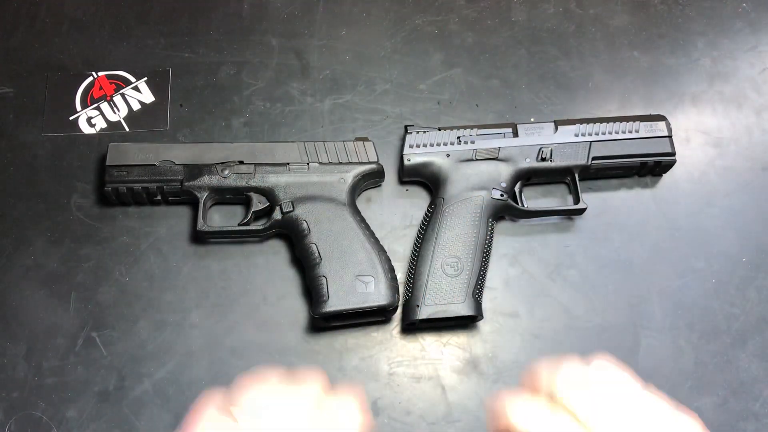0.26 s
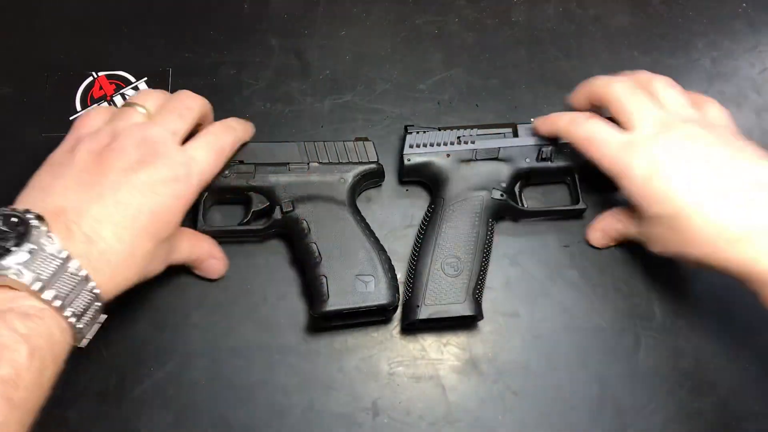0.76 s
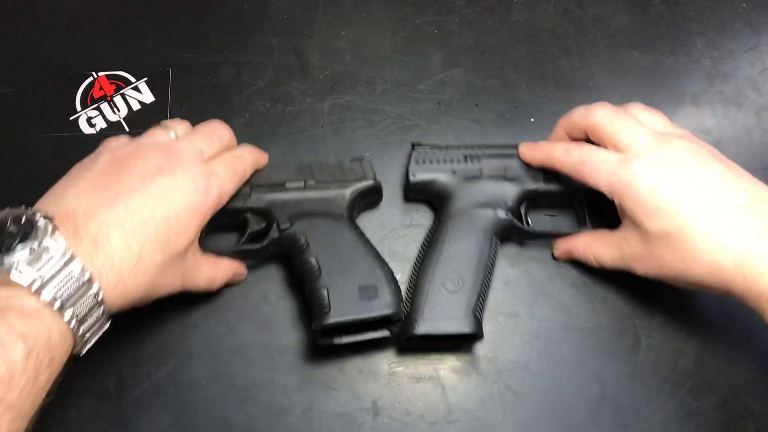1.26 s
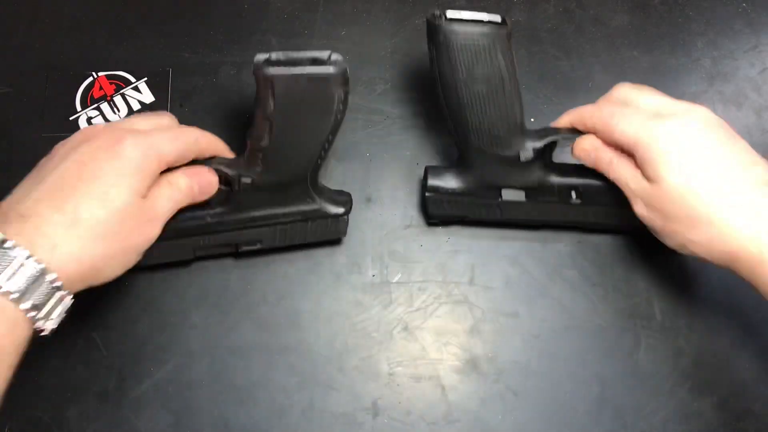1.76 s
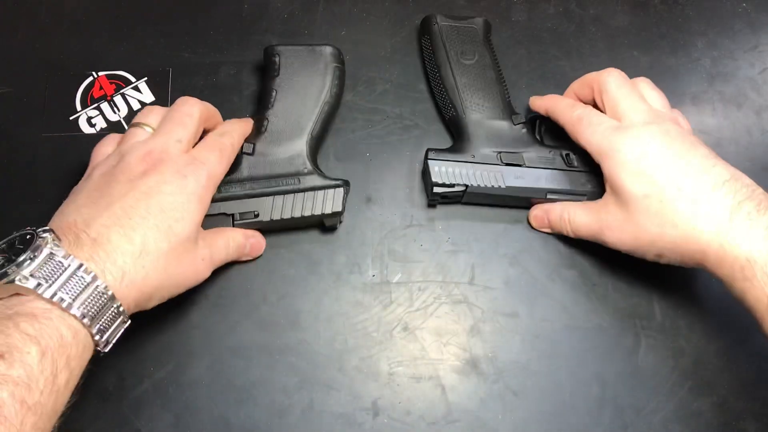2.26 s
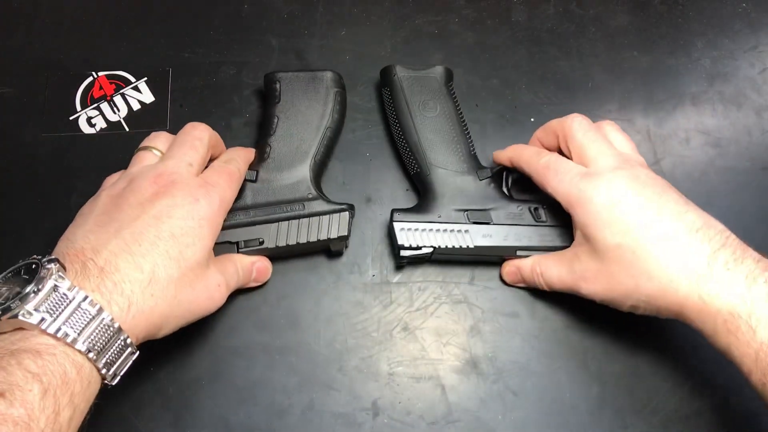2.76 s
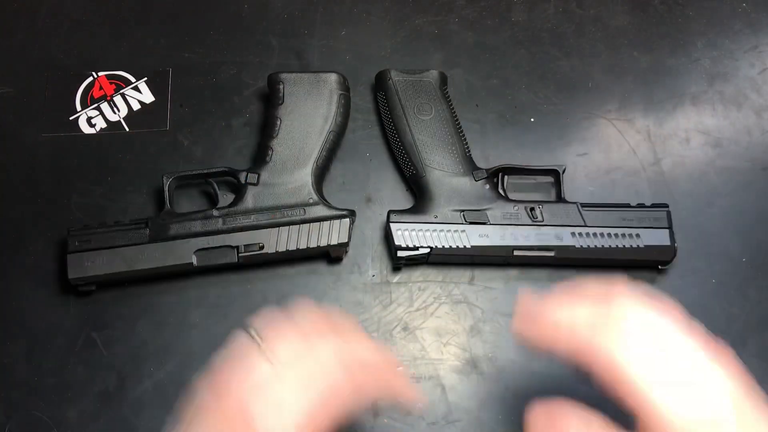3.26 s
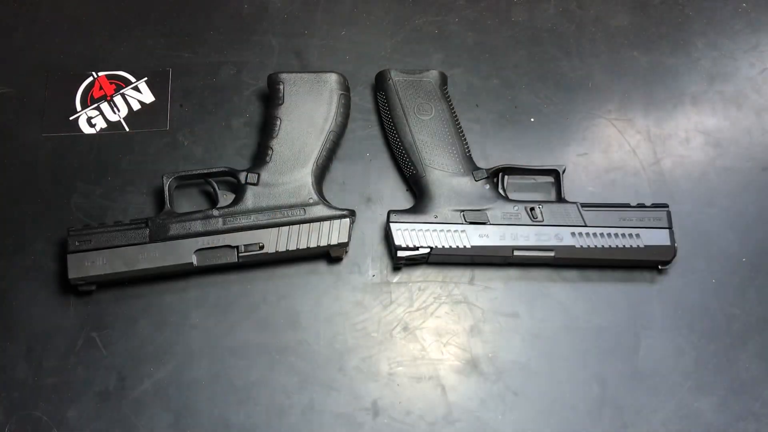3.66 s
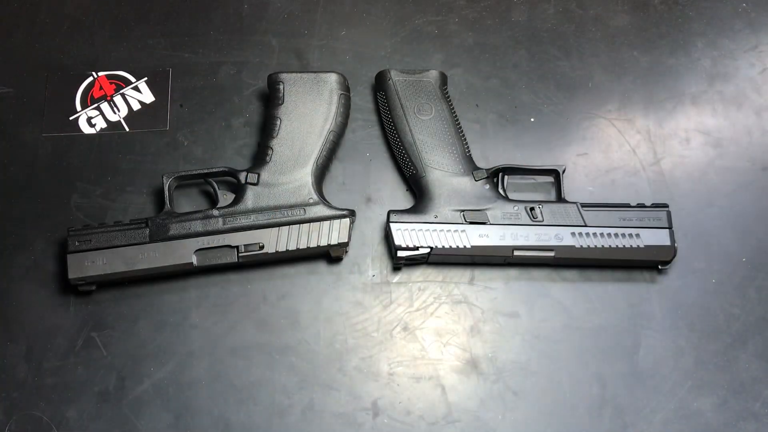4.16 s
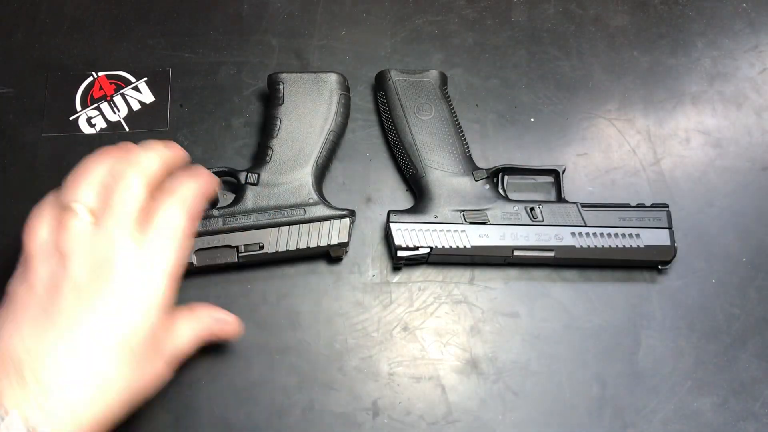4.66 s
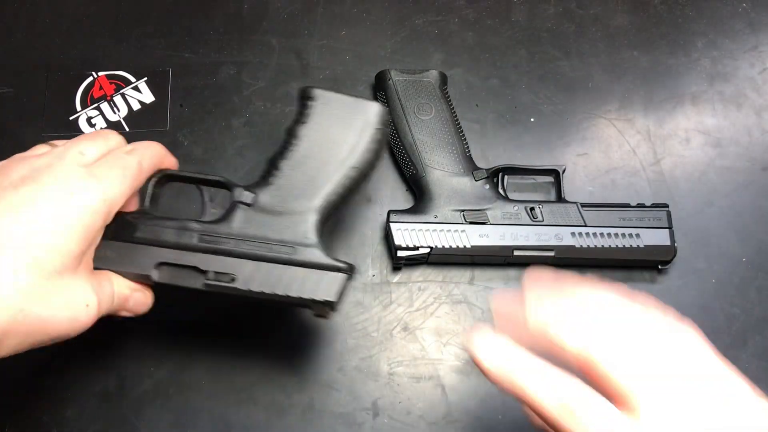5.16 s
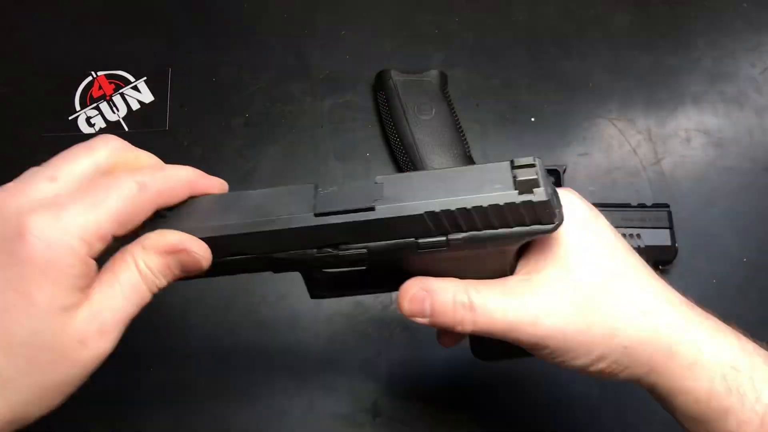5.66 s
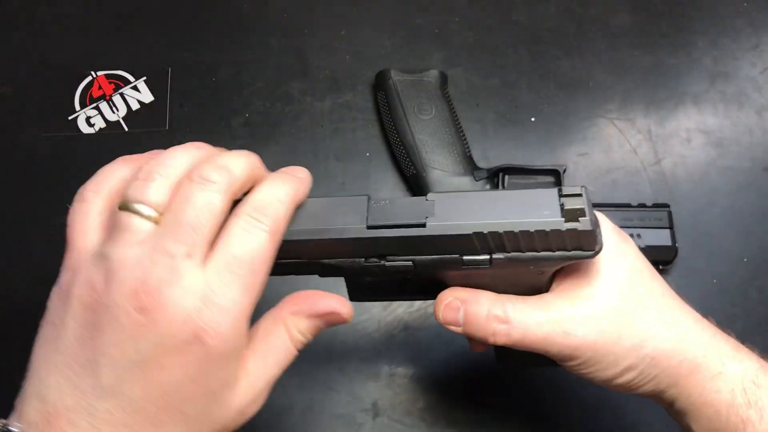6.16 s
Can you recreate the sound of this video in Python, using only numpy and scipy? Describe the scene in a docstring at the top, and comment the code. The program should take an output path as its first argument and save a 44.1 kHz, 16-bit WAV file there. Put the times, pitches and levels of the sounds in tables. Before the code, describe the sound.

In a small, slightly live room with a faint mains hum, hands rub softly over two pistols on a table. A tick and thump lead into one loud, bright steel double clack, followed by a run of low table thumps. Later come softer thuds, light clicks and dry sliding strokes. The microphone is close.

```python
"""A small room with a mains hum: two pistols are turned over by hand on a table, close to the microphone.
Damped steel modes and noise bursts snap in one loud double clack, with a faint spring ring behind it.
Frames tick in short noise bursts, thump the table's low modes and drag across it in strokes of noise.
Palms rub and hiss over the grips as shaped noise; duller knocks from farther off arrive as washes of echo."""
import sys
import numpy as np
from scipy import signal
from scipy.fft import rfft, irfft, next_fast_len
from scipy.io import wavfile
from scipy.ndimage import uniform_filter1d, map_coordinates

SR = 44100
rng = np.random.default_rng(int(sys.argv[2]) if len(sys.argv) > 2 else 0)


def file_out(sig):
    """Save sig as 16-bit WAV at sys.argv[1]."""
    # one column per channel
    cols = np.atleast_2d(sig).T
    # limit, then scale
    lim = np.clip(cols, -1, 1)
    pcm = np.round(lim * 32767).astype(np.int16)
    wavfile.write(sys.argv[1], SR, pcm)


N = 282681
T = np.arange(SR // 2) / SR  # time within one event, s


def amp(db):
    """Decibels to gain."""
    return 10 ** (np.asarray(db) / 20)


def unit(x):
    """Scale to rms 1."""
    return x / np.sqrt(np.mean(x ** 2) + 1e-20)


def along(points, hz):
    """Read a curve of (f/Hz, value) points on a log frequency axis."""
    f, v = np.transpose(points)
    return np.interp(np.log(hz + 1), np.log(f + 1), v)


def filtered(x, gain):
    """Shape a sound with a gain that depends on frequency."""
    m = next_fast_len(len(x) + 8192)
    spectrum = rfft(x, m) * gain(np.fft.rfftfreq(m, 1 / SR))
    return irfft(spectrum, m)[:len(x)]


def noise(gain, size):
    """Coloured noise of rms 1."""
    return unit(filtered(rng.standard_normal(size), gain))


def hump(hz, centre, octaves):
    """One broad resonance on a log axis, with the bass far below it rolled off."""
    peak = 1 / (1 + (np.log2((hz + 1) / centre) / octaves) ** 2)
    return peak / np.sqrt(1 + (centre / 8 / (hz + 1)) ** 4)


def wobble(rate, size):
    """A smooth random curve with rate knots a second."""
    knots = rng.standard_normal(int(size * rate / SR) + 4)
    return map_coordinates(knots, [np.arange(size) * rate / SR])


def patchy(x, depth_db):
    """Shifting contact: the colour of a rub changes from moment to moment."""
    z = signal.stft(x, nperseg=1024)[2]
    field = rng.standard_normal(z.shape)
    for _ in range(2):
        field = uniform_filter1d(field, size=7, axis=0)  # smooth over frequency
        field = uniform_filter1d(field, size=5, axis=1)  # smooth over time
    return unit(signal.istft(z * amp(depth_db * unit(field)), nperseg=1024)[1][:len(x)])


def add(track, s, sound):
    """Mix a sound in at time s."""
    start = max(round(s * SR), 0)
    part = track[start:start + len(sound)]
    part += sound[:len(part)]


# reverberation time of the room: (f/Hz, t60/s)
ROOM_DECAY = [(150, 0.13), (1000, 0.23), (4000, 0.3), (8000, .26), (15000, 0.22)]
# colour of the echo off the walls: (f/Hz, level/dB)
WALL_COLOUR = [(100, 2.5), (1000, 3), (2000, -5.5), (3000, -0.5), (3700, 1.5), (4400, -0.5), (5200, -5),
               (8000, -3), (10000, -2.5), (15000, -8)]


def room(x):
    """Diffuse answer of the walls: decaying noise whose high treble dies sooner than its upper mids."""
    hz, _, z = signal.stft(rng.standard_normal(SR // 2), SR, nperseg=256)
    t = np.arange(z.shape[1]) * 128 / SR  # half-overlapped frames
    decay = amp(-60 * t / along(ROOM_DECAY, hz)[:, None])
    tail = signal.istft(z * decay, SR, nperseg=256)[1][:len(T)]
    tail = filtered(tail, lambda hz: amp(along(WALL_COLOUR, hz)))
    tail = tail * np.clip((T - .005) / 0.002, 0, 1)  # 5 ms of silence before the echo fades in
    return signal.fftconvolve(x, tail / np.linalg.norm(tail))[:N]


# still room air: (f/Hz, relative level per Hz/dB)
AIR_COLOUR = [(15, -43.5), (25, -8.5), (70, -8), (120, -1.5), (145, -11), (175, -17), (373, -11),
              (911, -23.5), (1130, -24.5), (1890, -25), (7710, -40), (14800, -38.5), (16000, -44)]
# steady hum tones: (f/Hz, rms level before swell/dB)
HUM_TONES = [(120, -56.5), (240, -75), (262, -71.5), (360, -78)]


def background(air_db=-62):
    """A low hum of sines, slightly unsteady in level and phase, over the noise of still air."""
    t = np.arange(N) / SR
    hum = np.zeros(N)
    for hz, db in HUM_TONES:
        swell = amp(.8 * wobble(5, N))
        drift = .25 * wobble(4, N)  # radians
        hum += np.sqrt(2) * amp(db) * swell * np.sin(2 * np.pi * hz * t + drift)
    return hum + amp(air_db) * noise(lambda hz: amp(along(AIR_COLOUR, hz)), N)


# colour of distant knocks: (f/Hz, level/dB)
HOLLOW_COLOUR = [(100, -8), (280, -6.5), (450, 1), (850, -0.5), (1300, -9), (2000, -13), (3000, -9.5),
                 (6000, -15), (15000, -16.5)]
# knocks farther off: (t/s, relative level/dB, brightness corner f/Hz)
FAR_KNOCKS = [(1.797, -34.5, 1350), (2.669, -52.5, 804), (2.841, -52, 895), (2.896, -33.5, 10200),
              (3.349, -45.5, 980), (3.725, -51, 1405), (4.223, -42.5, 3570), (5.788, -51.5, 1800),
              (6.02, -55, 1110)]
KNOCK_RISE_S, KNOCK_T60_S = 0.0021, 0.38  # the same room carries them all


def knocks():
    """Distant knocks arrive as almost pure reverberation: decaying washes of hollow noise."""
    out = np.zeros(N)
    for s, db, corner_hz in FAR_KNOCKS:
        dulled = lambda hz: amp(along(HOLLOW_COLOUR, hz)) / np.sqrt(1 + (hz / corner_hz) ** 2)
        wash = noise(dulled, len(T))
        rise = 1 - np.exp(-T / KNOCK_RISE_S)
        add(out, s, amp(db + 1 - 60 * T / KNOCK_T60_S) * wash * rise)
    return out


# how hard the arms move: (t/s, effort level/dB)
ARM_EFFORT = [(0.0, -60), (0.36, -53), (0.59, -64), (1.07, -69), (1.55, -46.5), (1.91, -58.5), (2.23, -57),
              (2.71, -61.5), (3.28, -54), (3.8, -67), (4.12, -69), (4.28, -60.5), (4.8, -69.5),
              (5.0, -56.5), (5.32, -62.5), (5.75, -51.5), (6.16, -66), (6.41, -63.5)]
# table rumble: (f/Hz, relative level per Hz/dB)
RUMBLE_COLOUR = [(15, -43), (24, -24.5), (38, -4), (55, -0.5), (85, -1.5), (150, -13), (300, -29),
                 (700, -50.5)]
# palms sliding over the grips: (t/s, length/s, relative rub level/dB, relative skin hiss level/dB)
PALM_SLIDES = [(0.0, 0.063, -63.5, -61.5), (0.169, 0.2, -57, -66), (0.418, 0.6, -62.5, -63),
               (0.92, 0.18, -52, -56), (1.16, 0.32, -52, -68), (1.323, 0.073, -46.5, -53),
               (1.478, 0.27, -52, -57.5), (1.973, 0.19, -58, -62), (2.542, 0.2, -62, -77.5),
               (2.718, 0.51, -53.5, -64.5), (3.134, 0.34, -52.5, -60.5), (3.51, 0.17, -63.5, -62.5),
               (4.105, 0.18, -53.5, -61.5), (4.297, 0.12, -62.5, -56.5), (4.985, 0.15, -53, -73),
               (5.221, 0.19, -66.5, -71), (5.371, 0.35, -57, -55.5), (5.753, 0.15, -56, -72),
               (6.076, 0.25, -64.5, -64)]
# body of the rub: (f/Hz, relative level per Hz/dB)
RUB_COLOUR = [(120, -35), (200, -1.5), (256, -8), (453, -7.5), (887, -8.5), (1120, -13.5), (2180, -11.5),
              (4790, -18.5), (6530, -20), (10000, -35.5), (13000, -54), (22000, -120)]
# skin hiss: (f/Hz, relative level per Hz/dB)
HISS_COLOUR = [(2000, -19), (5000, -2.5), (8000, -2.5), (10500, -2), (13500, 1.5), (16000, -0.5)]
PALM_ATTACK_S, PALM_RELEASE_S = .03, 0.43  # takes hold quickly, lets go slowly (time to fall 60 dB)
RUMBLE_DB = 3.5  # table rumble over the arms' effort
# faint rustle at average effort, and the dB it gains per dB of effort
SLEEVE_RUB_DB, SLEEVE_HISS_DB, SLEEVE_GROWS = -69.5, -75, 0.43


def hands(grain_db=2):
    """Moving arms rumble through the table and rustle faintly, while palms rub and hiss over the grips."""
    t = np.arange(N) / SR
    effort_db = np.interp(t, *np.transpose(ARM_EFFORT))
    rustle_db = SLEEVE_GROWS * (effort_db - effort_db.mean())
    start, length, rub_db, hiss_db = np.transpose(PALM_SLIDES)[:, :, None]
    hold = np.clip((t - start) / PALM_ATTACK_S, 0, 1)
    contact = hold * amp(-60 * np.maximum(t - start - length, 0) / PALM_RELEASE_S)
    # palms and sleeves add as powers
    rubbing = np.hypot(np.linalg.norm(amp(rub_db) * contact, axis=0), amp(SLEEVE_RUB_DB + rustle_db))
    hissing = np.hypot(np.linalg.norm(amp(hiss_db) * contact, axis=0), amp(SLEEVE_HISS_DB + rustle_db))
    grain = unit(amp(grain_db * wobble(400, N)))
    rumble = amp(RUMBLE_DB + effort_db) * noise(lambda hz: amp(along(RUMBLE_COLOUR, hz)), N)
    rub = rubbing * patchy(noise(lambda hz: amp(along(RUB_COLOUR, hz)), N), depth_db=1.5)
    hiss = amp(-1.0) * hissing * noise(lambda hz: amp(along(HISS_COLOUR, hz)), N)
    return rumble + grain * (rub + hiss)


# skin and plastic sliding: (t/s, length/s, level at full speed/dB, centre f/Hz, width/octaves)
SLIDING_STROKES = [(0.251, 0.2, -57, 1870, 0.29), (.28, 0.068, -56.5, 6300, 0.23),
                   (0.656, 0.086, -53.5, 1720, 1.3), (0.923, 0.28, -54.5, 3670, 0.92),
                   (1.166, 0.19, -48, 600, 0.54), (1.56, 0.14, -48, 3510, 0.1),
                   (1.671, .07, -54.5, 2440, 0.025), (2.719, 0.064, -51, 2200, 0.62),
                   (3.394, 0.081, -51, 2060, 0.33), (3.529, 0.11, -51, 2600, 1.2),
                   (3.845, 0.076, -58.5, 2133, 0.46), (3.948, 0.16, -67.5, 3090, .07),
                   (4.105, 0.11, -47, 1384, 1.6), (4.109, 0.21, -57.5, 14040, .44),
                   (4.206, 0.23, -51, 360, 0.6), (4.975, 0.26, -44.5, 570, 0.59),
                   (4.98, 0.23, -49.5, 231, 0.37), (5.039, 0.19, -54, 2470, 0.39),
                   (5.386, 0.049, -53, 12900, 0.58), (5.398, 0.092, -44.5, 1410, 1.34),
                   (5.466, .11, -46, 1810, 0.54), (5.692, .04, -50.5, 9150, 3.4),
                   (5.789, 0.2, -64.5, 5930, 0.42), (6.092, 0.086, -49, 10440, 1),
                   (6.368, 0.14, -51, 367, 0.83)]
STROKE_RISE = 0.24  # share of a stroke spent gathering speed


def strokes(grip_db=0.5):
    """Friction noise swells and eases off with each stroke, catching and slipping as it goes."""
    out = np.zeros(N)
    for s, length, db, centre_hz, octaves in SLIDING_STROKES:
        speed = np.interp(T / length, [0, STROKE_RISE, 1], [0, 1, 0])
        friction = patchy(noise(lambda hz: hump(hz, centre_hz, octaves), len(T)), depth_db=3.0)
        grip = unit(amp(grip_db * wobble(250, len(T))))
        add(out, s, amp(db) * speed * friction * grip)
    return out


# table top modes: (f/Hz, level/dB, t60/s)
TABLE_MODES = [(60.5, -14, 0.27), (93, -2, 0.098), (131, -8, 0.053), (139.65, -2.5, 0.2), (191, -7.5, 0.11),
               (265.6, -4, 0.22), (275.5, -8.5, 0.31), (346, -1.5, 0.083), (396, -3, .09), (480, -4.5, .08),
               (618, -15.5, 0.3)]
# weight landing on one edge, then settling:
# (t/s, landing level/dB, softness corner f/Hz, delay to settling/s, settling level/dB)
TABLE_THUMPS = [(1.128, -35, 800, 0.021, -52), (1.18, -30.5, 650, .029, -34),
                (1.326, -23.5, 377.4, .021, -21.5), (1.417, -34.5, 350, 0.058, -35.5),
                (1.547, -28, 130, .02, -42), (1.645, -26, 520, 0.019, -19.5), (1.70, -27, 293, .02, -33),
                (2.074, -29.5, 254, 0.021, -48), (2.108, -19.5, 600, .018, -24),
                (2.203, -29, 355, .018, -35), (2.22, -25.5, 106, 0.0294, -37),
                (2.301, -35.5, 302, 0.0207, -40.5), (2.645, -32, 150, .1, -32),
                (3.0, -44, 200, .036, -31.5), (3.1657, -26.5, 507, .025, -32),
                (3.191, -23, 110, 0.036, -40), (3.284, -34, 400, 0.018, -35),
                (4.229, -29.5, 567, 0.0078, -48), (4.235, -32, 103.6, .034, -30),
                (4.845, -42, 793, 0.028, -34.5)]
CONTACT_CYCLES = 1  # a contact builds up over this many cycles of its corner
SETTLE_DULLING = 0.55  # the settling's corner over the landing's


def thumps():
    """A pistol's weight rings the table top on landing and settling; soft contacts are slow and low."""
    out = np.zeros(N)
    mode_hz, mode_db, t60 = np.transpose(TABLE_MODES)[:, :, None]
    for start, landing_db, landing_hz, delay, settle_db in TABLE_THUMPS:
        landing = (start, landing_db, landing_hz)
        settling = (start + delay, settle_db, SETTLE_DULLING * landing_hz)
        for s, db, corner_hz in [landing, settling]:
            size = amp(mode_db + rng.normal(0, 3.2, mode_hz.shape))
            size = size / np.sqrt(1 + (mode_hz / corner_hz) ** 6)
            # the hands load the top differently each time
            pitch = mode_hz * (1 + rng.normal(0, 0.031, mode_hz.shape))
            phase = rng.uniform(0, 2 * np.pi, mode_hz.shape)
            modes = size * np.sin(2 * np.pi * pitch * T + phase) * amp(-60 * T / t60)
            ring = np.sum(modes, 0) / np.linalg.norm(size)
            build_up = 1 - np.exp(-(T * corner_hz / CONTACT_CYCLES) ** 2)
            add(out, s, amp(db) * ring * build_up)
    return out


# light contacts of frames, triggers and fingers: (t/s, relative level/dB, centre f/Hz, width/octaves)
LIGHT_TICKS = [(0.215, -51, 11670, 0.55), (1.1259, -24, 1949, .6), (1.1413, -38, 1480, .6),
               (1.1827, -29.5, 1800, 0.6), (1.2603, -27.5, 7600, 0.24), (1.7989, -42, 1500, 0.43),
               (2.072, -39.5, 1474, 1.05), (2.108, -36, 594, 0.61), (2.11, -37.5, 2710, 0.61),
               (2.2042, -40.5, 1940, 2), (2.218, -40.5, 2480, 1), (2.274, -47, 2390, 0.87),
               (2.2992, -47.5, 2970, 1.37), (3.1913, -34, 2650, 1.13), (4.108, -49, 11000, 1.5),
               (4.8417, -27.5, 2370, 0.66), (4.853, -32, 3080, 0.56), (4.868, -34.5, 998, .6),
               (4.920, -47.5, 1500, 0.89), (5.081, -45.5, 6900, 0.66), (5.488, -36, 1925, 0.2),
               (5.771, -48, 4470, 0.47), (6.1079, -43, 9960, .5)]
TICK_T60_S = .023  # the hand damps them all alike


def ticks():
    """Contacts damped by the hand: a short noise burst around one pitch."""
    out = np.zeros(N)
    for s, db, centre_hz, octaves in LIGHT_TICKS:
        burst = noise(lambda hz: hump(hz, centre_hz, octaves), len(T))
        attack = 1 - np.exp(-T / 0.00027)
        add(out, s, amp(db + 0.5 - 60 * T / TICK_T60_S) * burst * attack)
    return out


# hard steel contacts, played by spring() and clacks():
# (t/s, relative level/dB, chatter time/s, ring level/dB, treble tilt/dB per octave)
STEEL_CLACKS = [(1.2606, -23.5, 0.0018, -3.5, 2.5), (1.2951, -8, .003, -1, -1.5),
                (1.314, -31.5, .001, 1, -2.5), (1.318, -7, 0.0044, -0.5, -0.5),
                (1.3319, -23, 0.0035, -4, 1.5)]
# lightly damped steel inside the pistol: (f/Hz, level/dB, t60/s)
SPRING_MODES = [(2400, -6.5, 0.26), (3585, 0.5, 0.27), (4380, -10.5, 0.51), (5730, -9.5, 0.3),
                (7240, -6.5, 0.15), (8500, -19.5, 0.35)]
SPRING_DB = -28  # its ring against the contact that starts it


def spring():
    """Each clack leaves a faint, longer, wavering ring in the lightly damped steel inside the pistol."""
    out = np.zeros(N)
    mode_hz, mode_db, t60 = np.transpose(SPRING_MODES)[:, :, None]
    for s, db, *_ in STEEL_CLACKS:
        phase = rng.uniform(0, 2 * np.pi, mode_hz.shape)
        ring = np.sum(amp(mode_db - 60 * T / t60) * np.sin(2 * np.pi * mode_hz * T + phase), 0)
        waver = amp(4.4 * wobble(120, len(T)))
        add(out, s, amp(db + SPRING_DB) * ring * waver)
    return out


# slide modes: (f/Hz, width/Hz, level before width weighting/dB)
SLIDE_MODES = [(1550, 86, -11), (1990, 64, -11), (2480, 110, -3), (3050, 77, -2), (3560, 140, -6),
               (4770, 92, 0), (5040, 90, -9), (5310, 79, -7), (5820, 39, -7), (6030, 56, -3),
               (6280, 110, -6), (7280, 94, -11), (7860, 49, -13), (8140, 200, -10), (8680, 78, -15),
               (8960, 46, -16), (9310, 84, -17), (10000, 57, -15), (10700, 240, -15), (11500, 88, -14),
               (11800, 89, -14), (12700, 130, -10), (13200, 140, -14), (14000, 120, -12), (14300, 94, -13),
               (14700, 73, -19)]
# contact noise: (f/Hz, relative level per Hz/dB)
CRACK_COLOUR = [(300, -47), (700, -23), (1050, -12), (1350, -4), (1900, -8.5), (2600, -1), (3900, -1.5),
                (4600, 6), (5600, -3.5), (8200, -6), (9800, -13), (14000, -13), (16000, -18)]


def clacks():
    """Steel chatters on steel for a few milliseconds, then the slide's damped modes ring out."""
    out = np.zeros(N)
    mode_hz, width, mode_db = np.transpose(SLIDE_MODES)[:, :, None]
    attack = 1 - np.exp(-T / .00015)
    for s, db, chatter, ring_db, tilt in STEEL_CLACKS:
        slope = lambda hz: amp(tilt * np.log2((hz + 100) / 4500))
        free = np.maximum(T - chatter, 0)  # time since the parts came to rest
        size = amp(mode_db + rng.normal(0, 1, mode_hz.shape)) * np.sqrt(width) * slope(mode_hz)
        phase = rng.uniform(0, 2 * np.pi, mode_hz.shape)
        modes = size * np.sin(2 * np.pi * mode_hz * T + phase) * np.exp(-np.pi * width * free)
        ring = np.sum(modes, 0) / np.linalg.norm(size)
        crack = noise(lambda hz: amp(along(CRACK_COLOUR, hz)) * slope(hz), len(T))
        crack = crack * amp(-4.5 - 60 * free / 0.024)  # falls 60 dB in 24 ms
        add(out, s, amp(db) * (amp(ring_db) * ring + crack) * attack)
    return out


def scene():
    """Close sounds with their share of the room, and what lies behind them."""
    steel = clacks() + spring()
    handling = ticks() + thumps() + strokes()
    near = steel + amp(-16.0) * room(steel) + handling + amp(-14.5) * room(handling)
    return (near + knocks() + hands() + background())[None]


TOP_HZ = 15800  # band limit


def record(dry):
    """The microphone rounds off the highest peaks, sheds the deepest bass and stops at its band limit."""
    rounded = dry[0] / (1 + np.abs(dry[0]) ** 6) ** (1 / 6)
    lean = filtered(rounded, lambda hz: 1 / np.sqrt(1 + (34 / (hz + 1)) ** 8))
    return filtered(lean, lambda hz: np.clip((TOP_HZ - hz) / 500 + .5, 0, 1))[None]


dry = scene()
out = record(dry)
file_out(out)
```